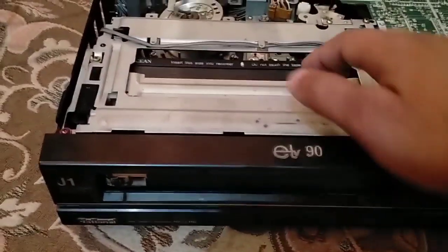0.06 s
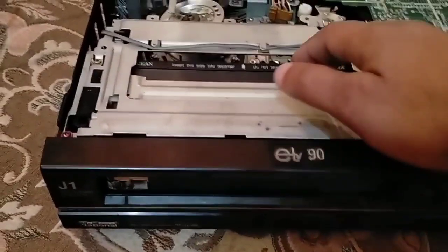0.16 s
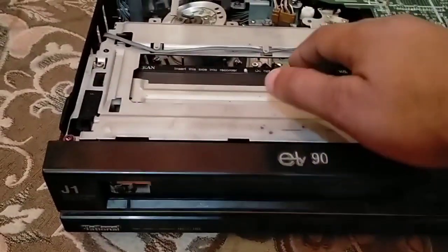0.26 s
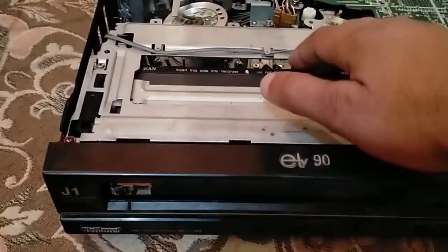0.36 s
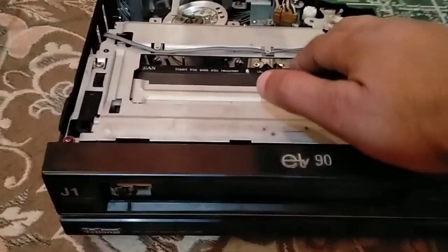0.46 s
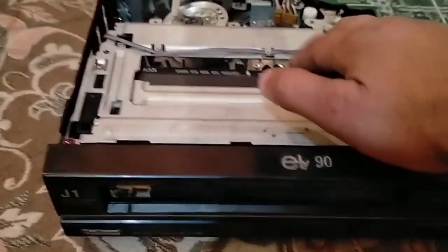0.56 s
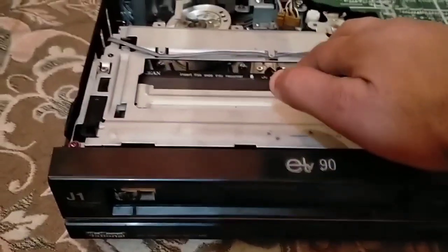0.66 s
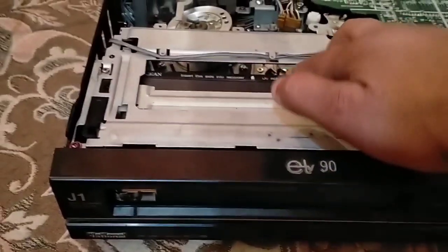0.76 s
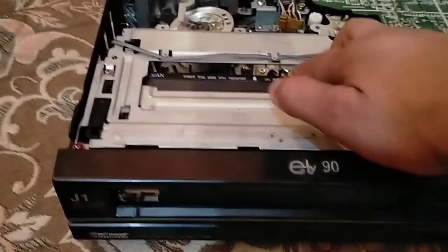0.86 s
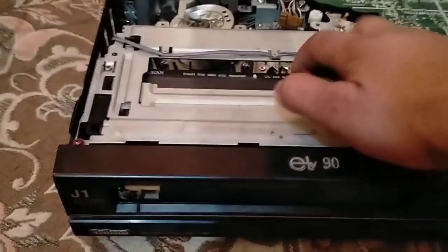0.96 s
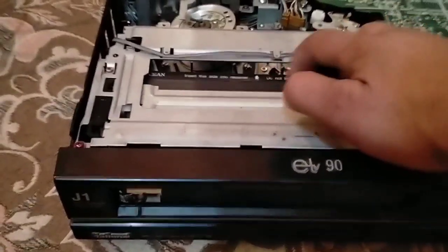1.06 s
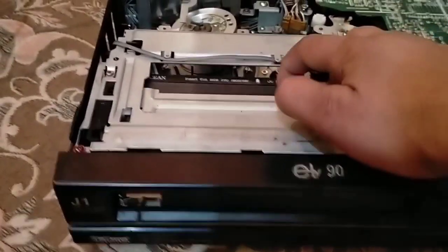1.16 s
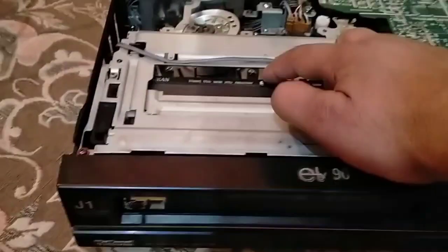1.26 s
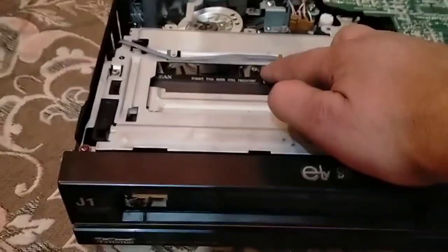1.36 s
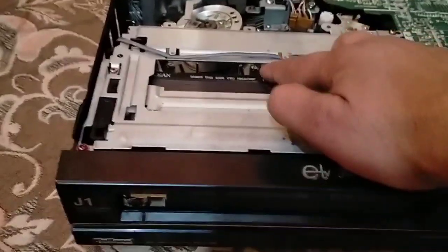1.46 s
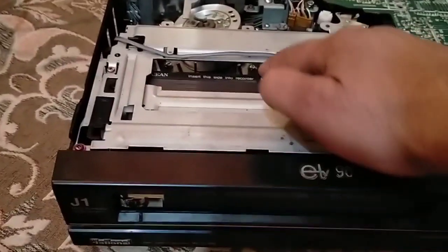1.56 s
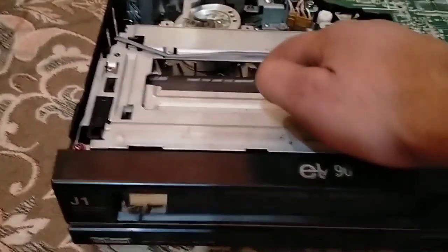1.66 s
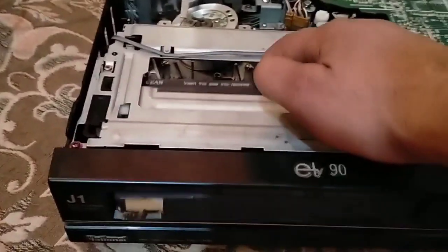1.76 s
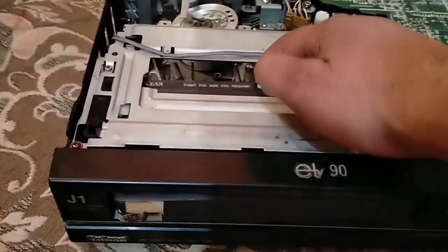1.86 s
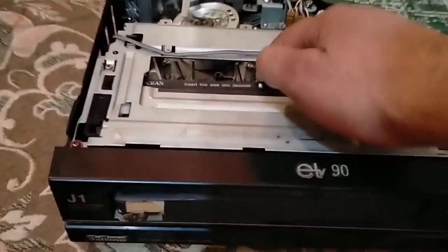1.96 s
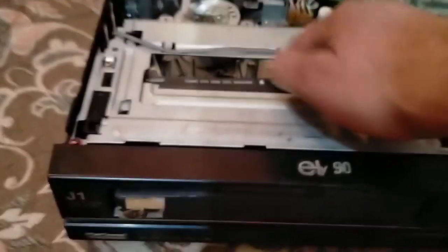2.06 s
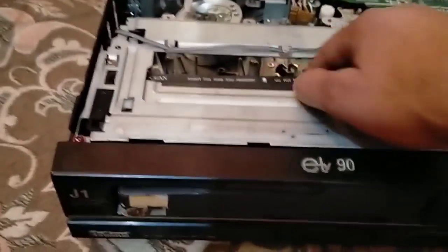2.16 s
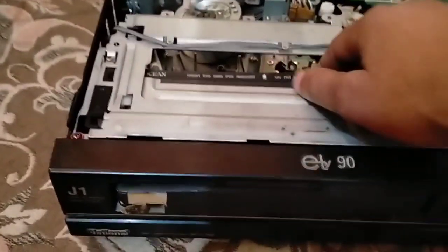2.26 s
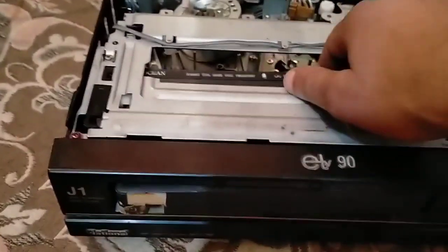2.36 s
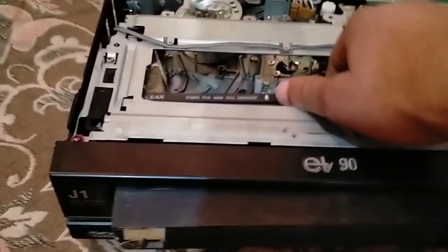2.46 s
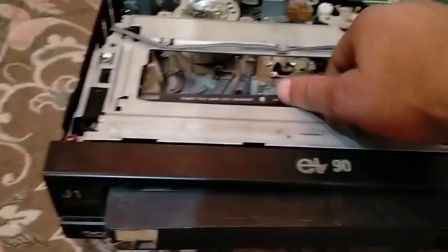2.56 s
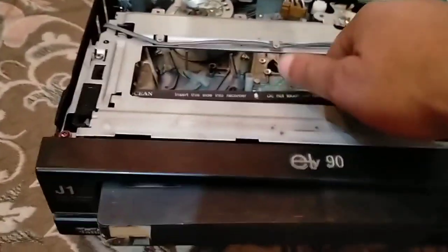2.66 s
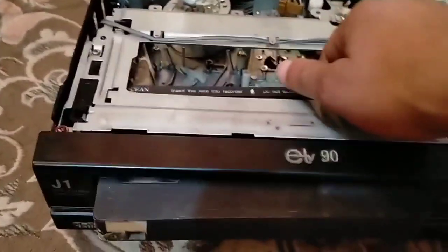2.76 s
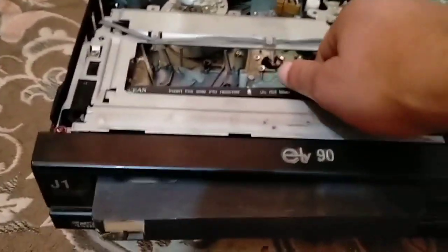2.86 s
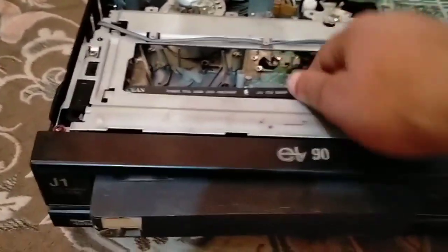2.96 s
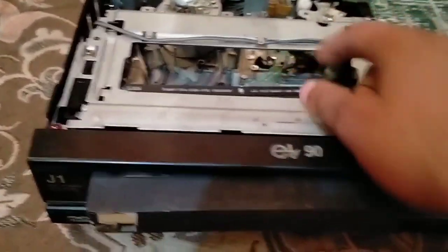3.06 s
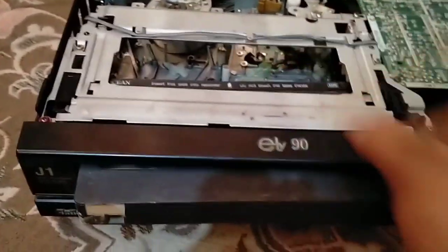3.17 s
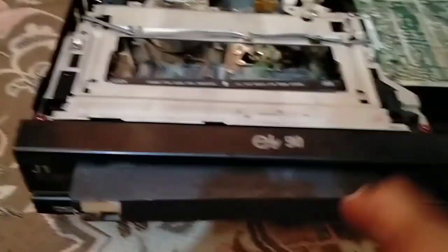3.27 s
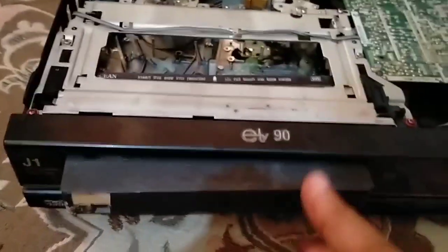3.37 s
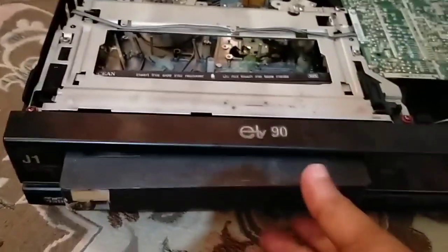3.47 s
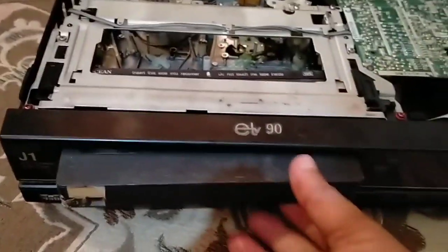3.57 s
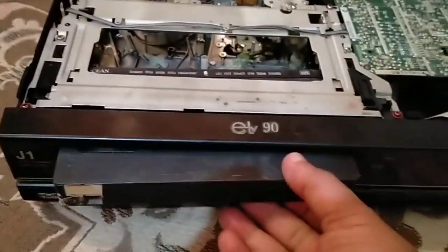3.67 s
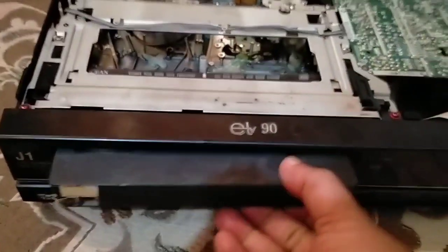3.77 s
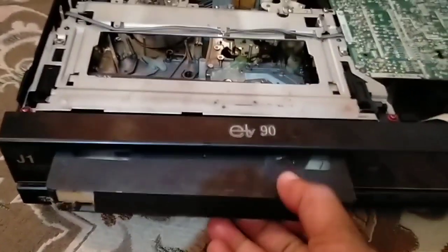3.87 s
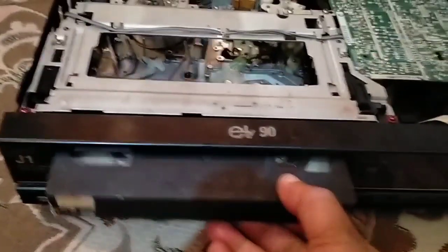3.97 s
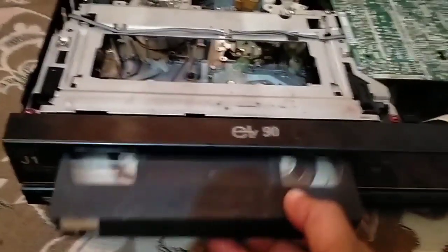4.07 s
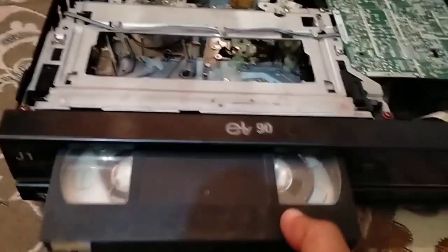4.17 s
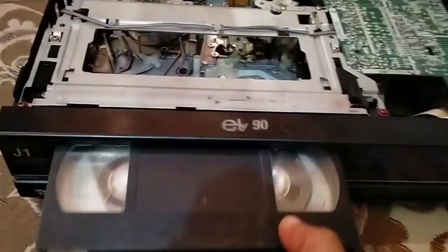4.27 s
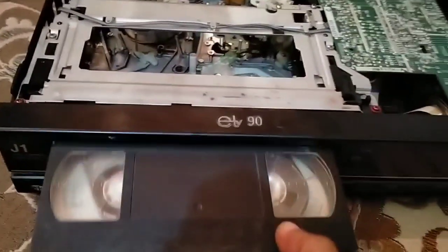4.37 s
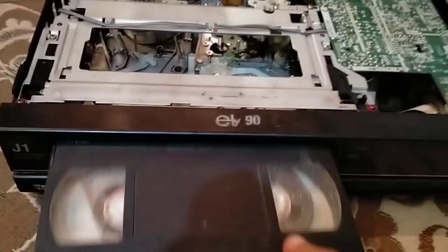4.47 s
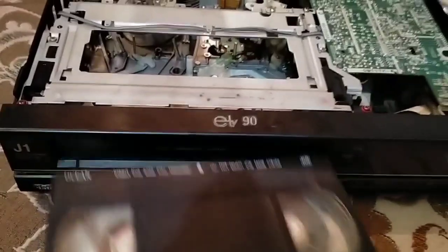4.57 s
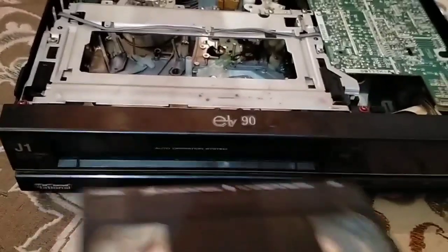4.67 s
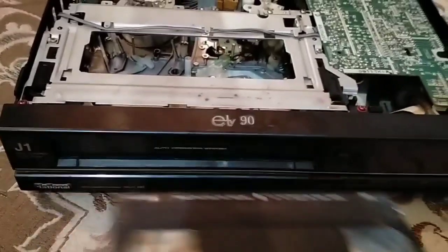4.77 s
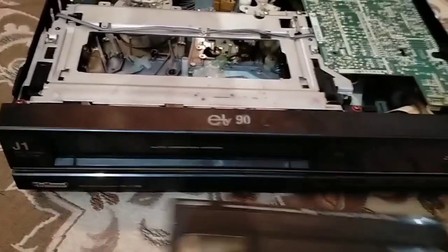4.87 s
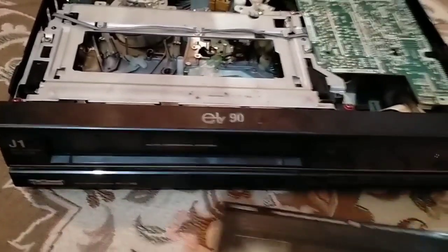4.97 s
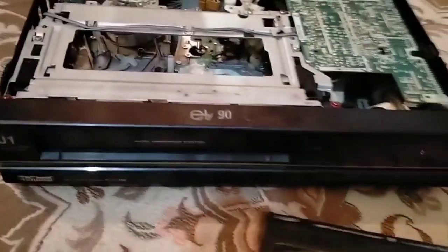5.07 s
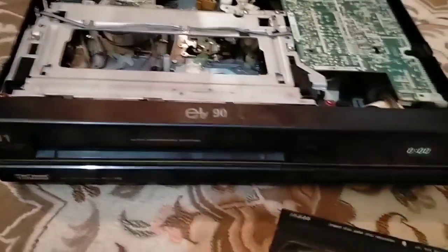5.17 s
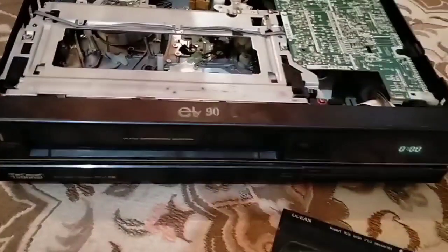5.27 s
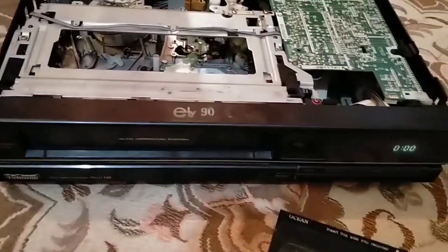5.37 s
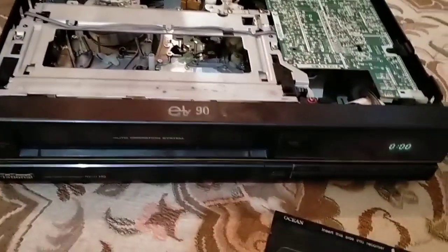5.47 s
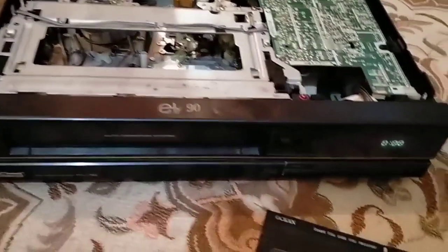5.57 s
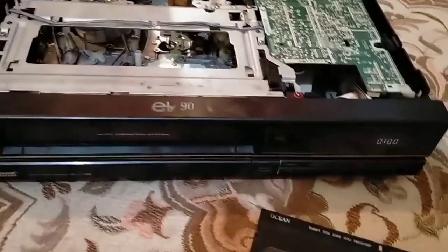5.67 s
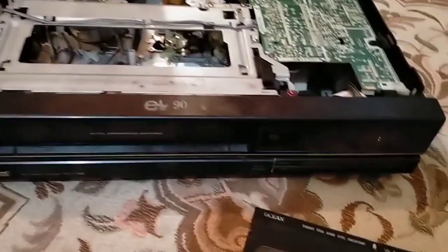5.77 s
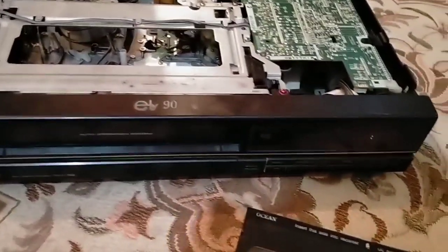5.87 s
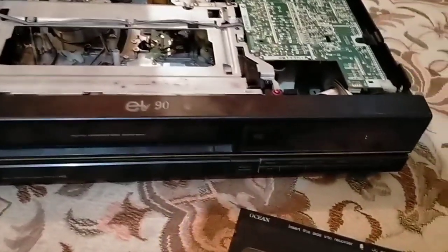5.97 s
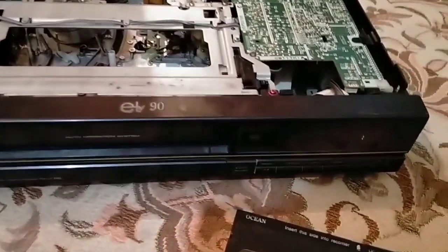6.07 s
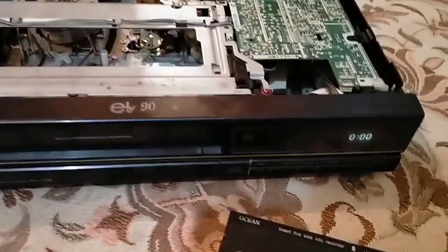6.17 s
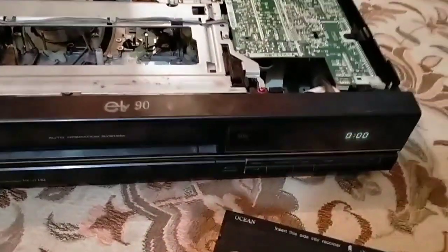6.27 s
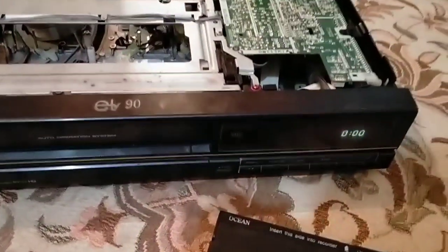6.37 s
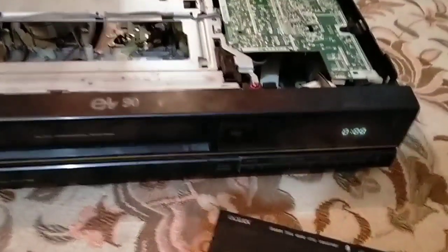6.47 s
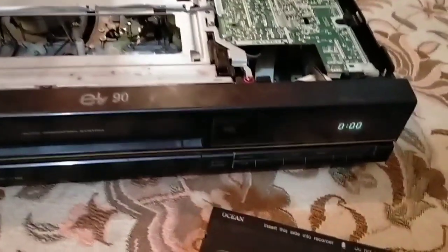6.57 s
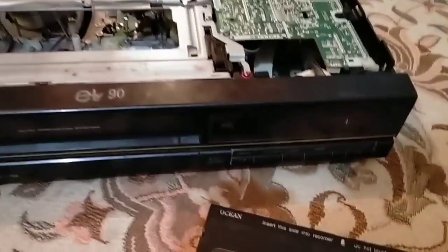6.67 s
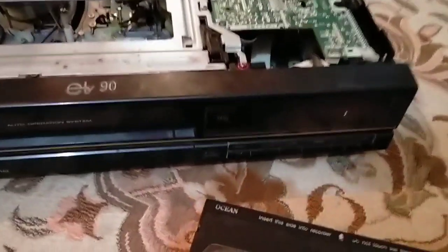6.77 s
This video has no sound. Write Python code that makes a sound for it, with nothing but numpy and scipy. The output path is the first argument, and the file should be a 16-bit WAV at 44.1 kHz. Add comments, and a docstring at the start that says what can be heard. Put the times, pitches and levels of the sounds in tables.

```python
"""An open video cassette player in a small room, heard close up on one hand-held microphone. Over a faint hum
and hiss, a hand works the cassette loose; the carriage clicks and scrapes. The cassette's edge brushes the
flap, and at 3.5 s the sprung latch snaps the cassette out. It is slid from the slot, the flap slaps shut at 5.1
s, and the cassette is set down on cloth. Every knock rings the same plastic shell and steel chassis, with a
short tail from the near walls."""
import sys
import numpy as np
from scipy import signal
from scipy.fft import rfft, irfft
from scipy.io import wavfile
from scipy.ndimage import uniform_filter1d

SR = 44100
rng = np.random.default_rng(int(sys.argv[2]) if len(sys.argv) > 2 else 0)


def store_wav(level_fs):
    """Save 16-bit WAV to argv[1]."""
    pcm = np.round(np.clip(np.atleast_2d(level_fs), -1, 1) * 32767)
    wavfile.write(sys.argv[1], SR, pcm.T.astype(np.int16))


N = 301203
TIME = np.arange(N) / SR
BINS_HZ = np.fft.rfftfreq(N, 1 / SR)

# Cassette and carriage knocking under the hand. Brightness is how hard the contact is, thud how much
# the whole player is jolted, hollow how much goes into the cassette's case and shell:
# (time [s], chassis pitch [Hz], contact [s], level [dB], brightness [dB], thud [dB], hollow [dB])
HAND_KNOCKS = [(.731, 633, 0.0095, -50, -2, -24, 2), (.848, 705, 0.002, -63, 2.5, -12, -1),
               (1.094, 647, 0.0041, -40.5, 1.5, -27, -6), (1.2447, 678, 0.0039, -39, 7, -17, 3),
               (1.266, 665, 0.0052, -48, 17, -4, 7), (1.2706, 645, 0.0052, -34, -9, -20, -6),
               (1.392, 630, 0.0018, -45, -7, -13, -2.5), (1.505, 646, .004, -62.5, 0, -6, -3),
               (1.588, 663, 0.003, -40.5, -13, -27, 3), (1.5938, 657, .008, -34.5, -1, -11.5, 3.5),
               (1.7095, 660, 0.0069, -38.5, 9, -20, -0.5), (1.737, 672, 0.0039, -58.5, 11, -25, 13.5),
               (2.2, 616, 0.0042, -49, 7, -22, -15), (2.214, 627, 0.0034, -46, -16, -14, -5),
               (2.308, 656, 0.0036, -57.5, -6, 2, 2.5), (2.388, 611, .0011, -30.5, -5.5, -20, 2),
               (2.5532, 656, 0.0037, -37.5, 6.5, -24, -1), (2.7373, 745, 0.0047, -40, -7.5, -34, -0.5),
               (2.9415, 667, 0.004, -44, 10, -3, 4.5), (2.9693, 670, 0.0027, -42.5, 11.5, -4, 2),
               (2.9803, 690, 0.0043, -44.5, 8.5, 2.5, 6), (3.0674, 654, 0.0035, -32.5, -1.5, -39, 5.5),
               (3.262, 665, .003, -65, 1.5, -6.5, -0.5), (4.299, 611, 0.001, -45, -0.5, -33, -4.5),
               (4.354, 650, 0.0035, -55, 2, -26, -4), (4.478, 640, 0.0028, -54.5, -3, -27, 3),
               (4.516, 634, 0.008, -50, -16, -26, -12), (4.554, 645, .009, -44.5, -10, -30, -10),
               (4.578, 624, 0.0043, -47, -19, -28, -7), (4.604, 660, 0.0064, -51, 2, -19, 7.5),
               (4.631, 638, 0.0036, -46.5, -11, -16, 0), (4.792, 610, 0.0018, -58.5, -7, -14, 3),
               (4.982, 623, 0.0025, -43.5, -1, -13, 0.5), (5.053, 640, 0.0025, -43.5, -27, -31, -1),
               (5.645, 617, 0.0045, -58.5, 0.5, -23, 7.5), (5.827, 710, 0.011, -62.5, 3.5, -15, 10.5),
               (6.063, 636, 0.016, -47.5, 1.5, 1, -1)]
# latch, then flap, snapping home: (the columns of HAND_KNOCKS, rebound delay [s])
SPRING_SNAPS = [(3.4883, 747, 0.0031, -38, 12, -7, 1.5, .028),
                (5.0762, 774, 0.00092, -39.5, 5, -8.5, -1.5, .022)]
# the six registers of a blow, low to high: thud, case, chassis, shell, click, tick
REGISTER_NAMES = ["thud", "case", "chassis", "shell", "click", "tick"]
# their borders: (frequency [Hz])
REGISTER_BORDERS = [60, 250, 520, 1000, 2400, 9000, 16000]
# a knock's share in each register: (offset from its level [dB])
KNOCK_SPECTRUM = [-1.5, -6.5, 0.5, -4.5, -5.5, -13]
# a snap's share in each register: (offset from its level [dB])
SNAP_SPECTRUM = [0, -6.5, -0.5, 6, 1, -2.5]
# a harder contact feeds the treble most; for each register: (gain per brightness [dB/dB])
HARDNESS_SLOPES = [0, 0, 0, 0.29, 0.8, 1.43]
# loose parts in each register: (rattle t60 [s], ring over rattle [dB])
REGISTER_RATTLE = [(0.0089, 0.5), (0.027, 4), (0.057, 6), (0.04, -2.5), (0.023, -14), (0.018, -13.5)]
# resonances of player and cassette: (frequency [Hz], weight within the register [dB], t60 [s])
BODY_MODES = [(122, -11.5, .035), (208.2, -1.5, 0.051), (306.5, -8, 0.053), (381, 2, 0.032),
              (424, -8, 0.038), (612, -5.5, 0.027), (657.6, 1.5, 0.046), (765, -8, 0.04), (1085, -8, 0.03),
              (1270, -16, 0.027), (1663, 2, 0.075), (1760, 5.5, 0.029), (1887, -5, 0.033),
              (2497, -12, 0.012), (3050, 2.5, 0.081), (4340, -3, 0.025), (6820, -2.5, 0.018),
              (14360, -2, 0.0077)]
# colour of plastic rubbing and rattling in the chassis: (frequency [Hz], gain [dB])
PLASTIC_COLOUR = [(200, -11), (380, -2), (520, -5), (640, 5), (850, -7.5), (1400, -8.5), (1750, -8.5),
                  (2800, -12), (5500, -20), (7900, -18), (9200, -30.5), (11300, -26), (13600, -19),
                  (16000, -20.5)]
# plastic sliding on the guides, the push growing or easing evenly through each stroke:
# (start [s], length [s], relative level [dB], brightness [dB], growth [dB])
SLIDE_STROKES = [(1.092, 0.014, -60, 3, -2), (2.177, 0.086, -62, 6.5, -13), (2.949, 0.052, -42.5, 3, -1),
                 (4.276, 0.089, -68.5, 7.5, 7), (4.522, 0.036, -50.5, 3, 6.5),
                 (4.602, 0.26, -56.5, -3, -13.5), (4.867, .11, -51.5, -7.5, 17),
                 (5.024, .035, -52.5, -3.5, 3), (5.811, 0.018, -58, -7, -4), (5.955, 0.041, -60.5, -11, 1)]
# body, scrape and hiss of a slide: (offset from its level [dB], gain per brightness [dB/dB])
SLIDE_SPECTRUM = [(0, 0), (-2.5, 1.0), (-10, 1.27)]
# borders of those three bands: (frequency [Hz])
SLIDE_BORDERS = [200, 1000, 9000, 16000]
# resonances woken by the cassette's edge on the flap: (frequency [Hz], half width [Hz], relative level [dB])
FLAP_PEAKS = [(810, 35, 1.5), (2400, 300, -9.5)]
# the room's tail: (low edge [Hz], high edge [Hz], t60 [s], level against the direct sound [dB])
ROOM_TAIL = [(77.4, 1080, 0.33, -10.5), (870, 3360, 0.25, -9), (3470, 11000, 0.25, -11),
             (9450, 21000, 0.15, -8)]
# broad colour of the room tone: (frequency [Hz], relative density [dB])
TONE_FLOOR = [(25, -95.5), (70, -94.5), (200, -100), (450, -109), (800, -111), (1100, -107), (1900, -110),
              (3500, -118), (5000, -122.5), (6500, -118.5), (9300, -123), (11500, -120), (14000, -110),
              (15500, -108)]
# its hum and narrow bands of hiss: (frequency [Hz], half width [Hz], relative density [dB])
TONE_PEAKS = [(108.2, 6.3, -80.5), (1351, 72, -95), (2770, 30, -106), (7470, 280, -115)]
# its slow rise and fall, taken about the mean: (time [s], level [dB])
TONE_SWELL = [(0.0, -74), (0.48, -75.5), (1.25, -69), (2.17, -71), (2.34, -69), (3.46, -67.5),
              (3.65, -70.5), (4.09, -77), (5.02, -69), (5.52, -74.5), (6.11, -73), (6.83, -75)]

CHASSIS_HZ = 650  # the chassis pitch that leaves the modes unshifted


def knocks(rows, spectrum_db, follow=0.24, scatter_db=3.0, detune=0.028, push_s=0.0018, bite=0.12,
           chatter_db=2.5, size=5000):
    """Each blow rings cassette and player, while loose parts chatter for as long as the contact lasts."""
    starts, pitch_hz, contact_s, level_db, bright_db, thud_db, hollow_db = np.transpose(rows)[:7, :, None]
    extra_db = {"thud": thud_db, "case": hollow_db, "shell": hollow_db}
    t = np.arange(size) / SR
    chance = rng.standard_normal((len(rows), len(BODY_MODES), 3))
    noise = plastic(rng.standard_normal(N))[:len(rows) * size].reshape(-1, size)
    # the contact makes and breaks several times, so the rattle comes in tiny bursts
    bursts = undb(chatter_db * np.repeat(rng.standard_normal((len(rows), size // 20)), 20, axis=1))
    chatter = uniform_filter1d(bursts, size=16, axis=1)
    # the grip and the cassette's place shift the chassis resonances; the others follow a little
    shift = pitch_hz / CHASSIS_HZ
    blows = np.zeros((len(rows), size))
    for k, (name, (rattle_t60, ring_db)) in enumerate(zip(REGISTER_NAMES, REGISTER_RATTLE)):
        lo, hi = REGISTER_BORDERS[k:k + 2]
        ring = 0
        for m, (hz, db, ring_t60) in enumerate(BODY_MODES):
            if lo <= hz < hi:
                mistune, place, phase = chance[:, m].T[:, :, None]
                pitch = hz * (shift if name == "chassis" else shift ** follow) * (1 + detune * mistune)
                gain = undb(db + scatter_db * place)  # depends on where the blow lands
                ring = ring + gain * np.sin(2 * np.pi * pitch * t + phase) * fade(t, ring_t60)
        ring = ring * (1 - np.exp(-t / push_s))
        onset = 1 - np.exp(-t / (bite * contact_s))  # a long, soft contact sets in more slowly
        contact = onset * fade(np.maximum(t - contact_s, 0), rattle_t60)
        rattle = band(noise * chatter * contact, lo, hi)
        register_db = level_db + spectrum_db[k] + HARDNESS_SLOPES[k] * bright_db + extra_db.get(name, 0)
        blows += unit(unit(rattle) + undb(ring_db) * unit(ring)) * undb(register_db)
    out = np.zeros(N + size)
    for start, blow in zip(starts[:, 0], blows):
        i = int(start * SR)
        out[i:i + size] += blow * np.sqrt(SR / 100)  # level is the energy as an rms over 10 ms
    return out[:N]


def snaps(contact_s=0.004, rebound_db=-1.5, bright_db=3, thud_db=-23, hollow_db=-2):
    """A spring throws latch or flap against its stop; the settings shape its one duller rebound."""
    rebounds = [(time_s + delay_s, CHASSIS_HZ, contact_s, db + rebound_db, bright_db, thud_db, hollow_db)
                for time_s, _, _, db, *_, delay_s in SPRING_SNAPS]
    return knocks(SPRING_SNAPS, SNAP_SPECTRUM, follow=.35) + knocks(rebounds, KNOCK_SPECTRUM)


def slides(judder_db=2.0, judder_hz=110, edge_s=0.033, gain_db=-3.0):
    """Plastic slips and judders along its guides, coloured by shell and chassis."""
    rub = plastic(rng.standard_normal(N)) * undb(judder_db * walk(judder_hz))
    bands = [unit(band(rub, lo, hi)) * np.sqrt(N) for lo, hi in zip(SLIDE_BORDERS, SLIDE_BORDERS[1:])]
    out = 0
    for start_s, length_s, level_db, bright_db, growth_db in SLIDE_STROKES:
        progress = np.clip((TIME - start_s) / length_s, 0, 1)
        pressure = stroke(start_s, length_s, edge_s) * undb(level_db + growth_db * (progress - .5))
        scrape = sum(x * undb(db + slope * bright_db) for x, (db, slope) in zip(bands, SLIDE_SPECTRUM))
        out = out + pressure * scrape
    return out * undb(gain_db)


def edge_rub(start_s=3.32, length_s=0.091, level_db=-61, edge_s=.04):
    """The hand reaches the cassette; its edge brushes the flap and wakes two broad resonances."""
    rub = irfft(rfft(rng.standard_normal(N)) * np.sqrt(humps(FLAP_PEAKS)), N)
    return unit(rub) * np.sqrt(N) * undb(level_db) * stroke(start_s, length_s, edge_s)


def room(x, gap_s=0.0057, build_s=0.0088, size=14000, positions=6):
    """Near walls and furniture return a short tail whose pattern changes as the microphone moves."""
    t = np.arange(size) / SR
    arrival = np.clip((t - gap_s) / build_s, 0, 1)
    tails = 0
    for lo, hi, t60, db in ROOM_TAIL:
        echoes = unit(band(rng.standard_normal((positions, size)), lo, hi) * arrival * fade(t, t60))
        tails = tails + undb(db) * np.sqrt(2 * (hi - lo) / SR) * echoes
    mic_place = np.linspace(0, positions - 1, N)
    crossfades = [np.sqrt(np.clip(1 - abs(mic_place - k), 0, 1)) for k in range(positions)]
    return sum(signal.oaconvolve(x * weight, tail)[:N] for weight, tail in zip(crossfades, tails))


def room_tone(hum_gain_db=2.5, hiss_gain_db=3.5, hum_swell=0.67, waver_db=1.0):
    """Behind the player, a wavering low hum lies under a soft, coloured hiss."""
    density = colour(TONE_FLOOR) ** 2 + humps(TONE_PEAKS)
    spectrum = rfft(rng.standard_normal(N)) * np.sqrt(density * SR / 2)
    low = BINS_HZ < 250
    level_db = np.interp(TIME, *np.transpose(TONE_SWELL))
    swell_db = level_db - level_db.mean() + waver_db * walk(rate_hz=5.35)
    hum = irfft(spectrum * low, N) * undb(hum_gain_db + hum_swell * swell_db)
    hiss = irfft(spectrum * ~low, N) * undb(hiss_gain_db + swell_db)
    return hum + hiss


def plastic(x):
    """Give a stream of tiny contacts the broad resonances of shell and chassis."""
    return irfft(rfft(x) * colour(PLASTIC_COLOUR), N)


def stroke(start_s, length_s, edge_s):
    """Attack, hold and release of a rubbing contact."""
    return np.clip(1 + np.minimum(TIME - start_s, start_s + length_s - TIME) / edge_s, 0, 1)


def humps(peaks):
    """Power spectrum of peaks given as (frequency [Hz], half width [Hz], level [dB])."""
    return sum(undb(db) ** 2 * np.exp(-.5 * ((BINS_HZ - hz) / width) ** 2) for hz, width, db in peaks)


def colour(points):
    """Gain curve through points given as (frequency [Hz], level [dB])."""
    hz, db = np.transpose(points)
    return undb(np.interp(np.log(BINS_HZ + 1), np.log(hz), db))


def walk(rate_hz):
    """Smooth random wander with a spread near one."""
    return np.interp(TIME * rate_hz, np.arange(2048), rng.standard_normal(2048))


def fade(t, t60):
    """Exponential decay, 60 dB down after t60."""
    return np.exp(-np.log(1000) * t / t60)


def band(x, lo, hi, order=3):
    """Causal band-pass along the last axis."""
    return signal.sosfilt(signal.butter(order, [lo, hi], "band", fs=SR, output="sos"), x)


def unit(x):
    """Scale each row to an energy of one."""
    return x / np.sqrt(np.sum(x ** 2, axis=-1, keepdims=True))


def undb(db):
    """Decibels to gain."""
    return 10 ** (np.asarray(db) / 20)


def scene():
    """At the microphone, in mono: the player close by, the near walls, and room tone behind."""
    handling = knocks(HAND_KNOCKS, KNOCK_SPECTRUM) + snaps() + slides() + edge_rub()
    return (handling + room(handling) + room_tone())[None]


def record(dry):
    """The recorder cuts the top steeply above 15.6 kHz."""
    return signal.sosfilt(signal.ellip(10, .2, 70, 15600, fs=SR, output="sos"), dry)


dry = scene()
out = record(dry)
store_wav(out)
```